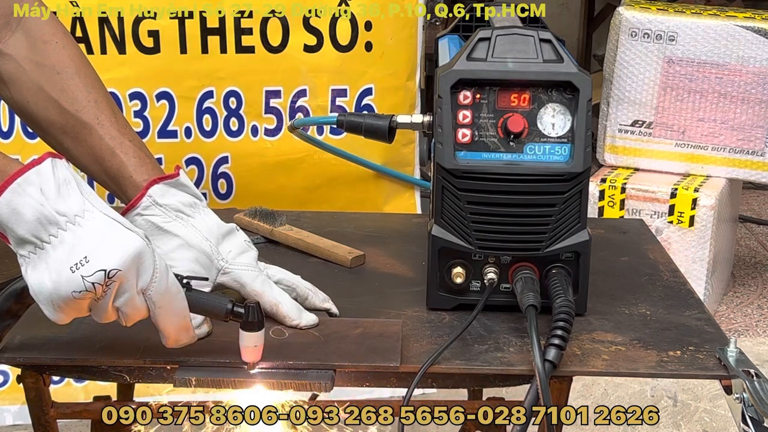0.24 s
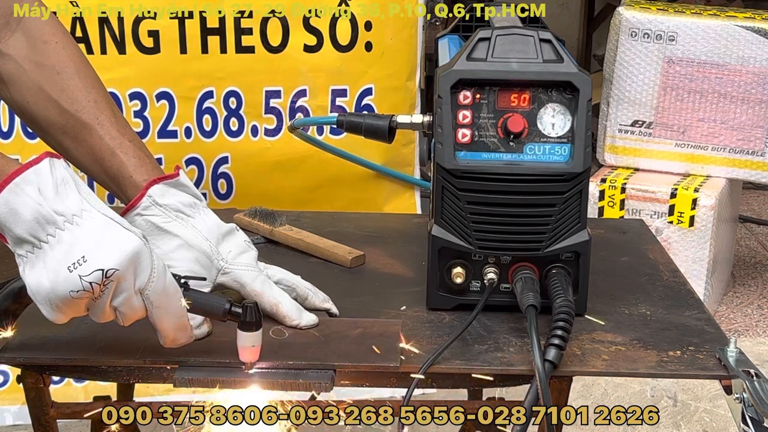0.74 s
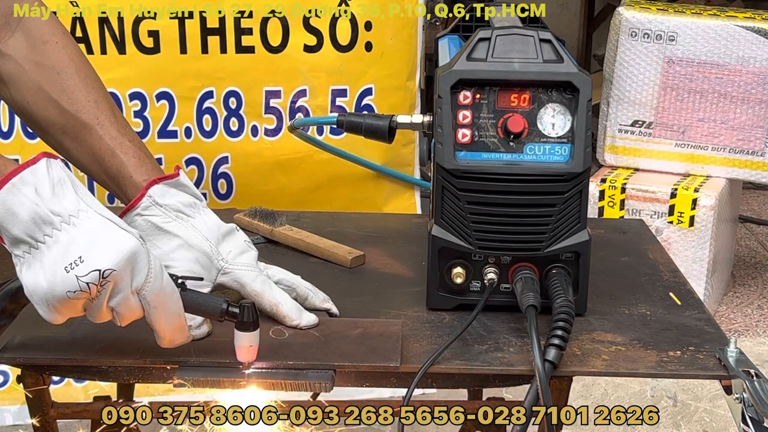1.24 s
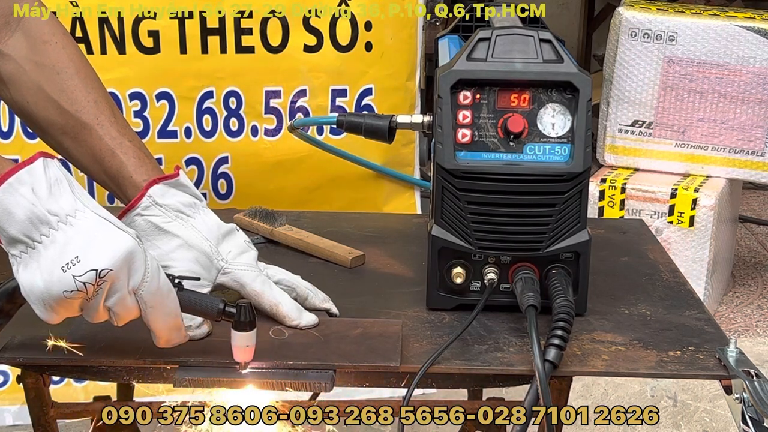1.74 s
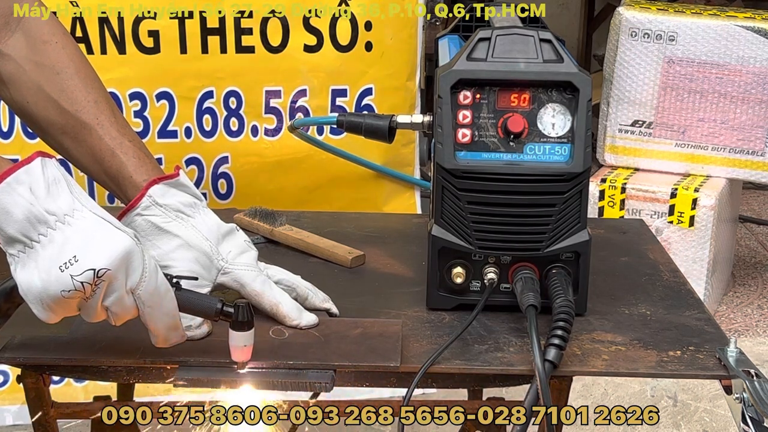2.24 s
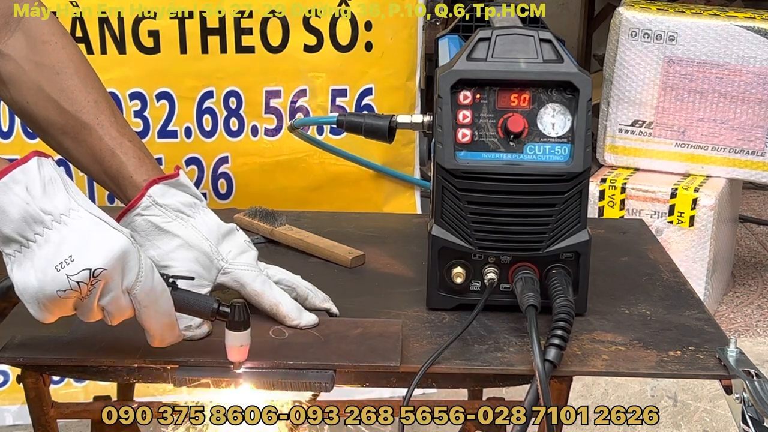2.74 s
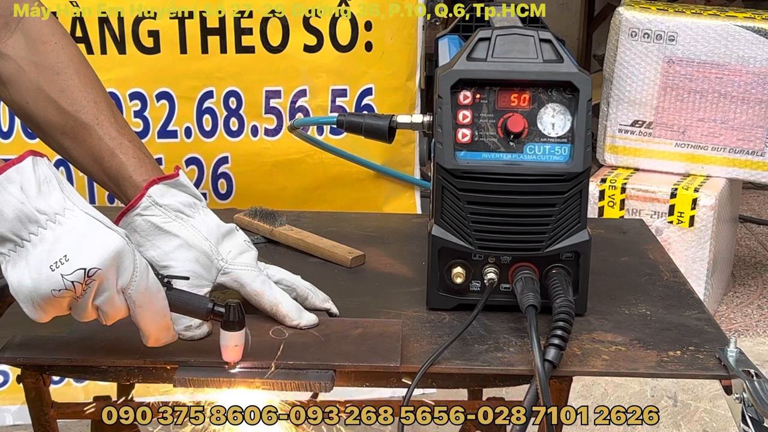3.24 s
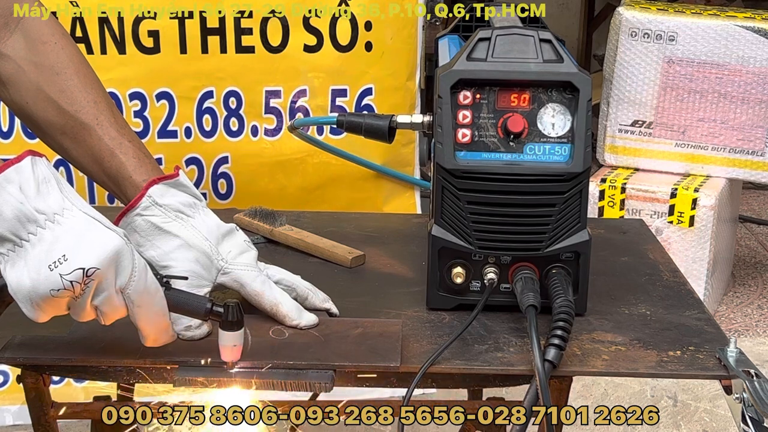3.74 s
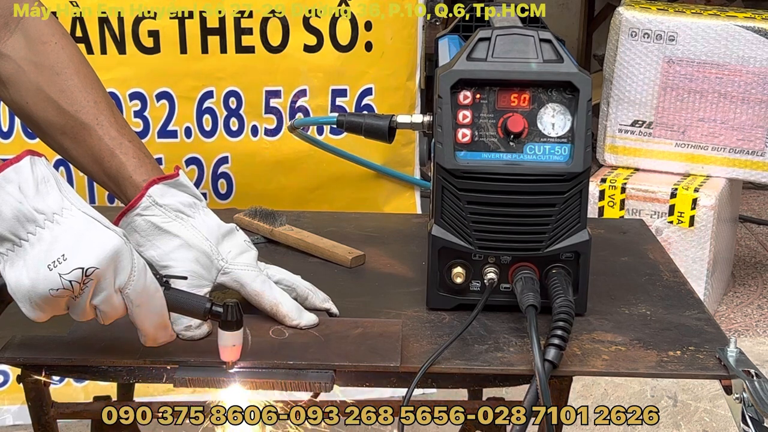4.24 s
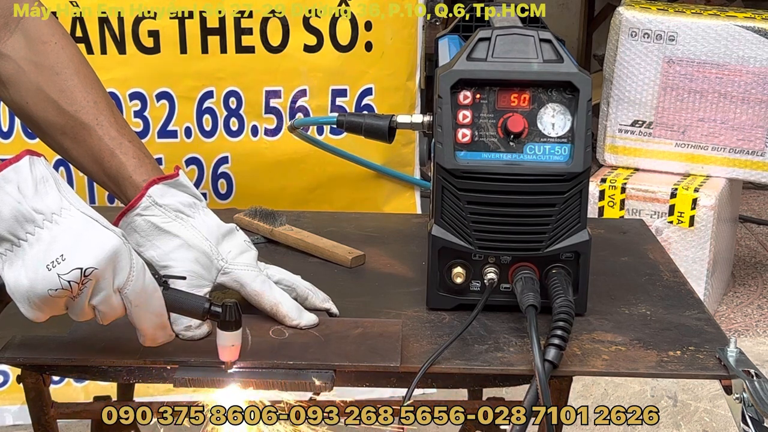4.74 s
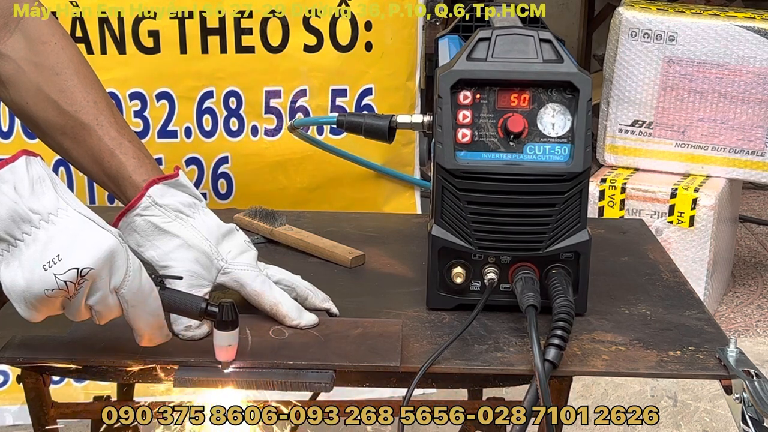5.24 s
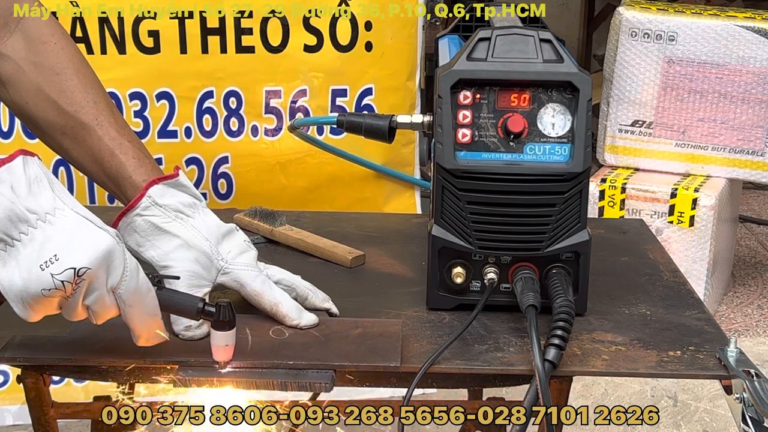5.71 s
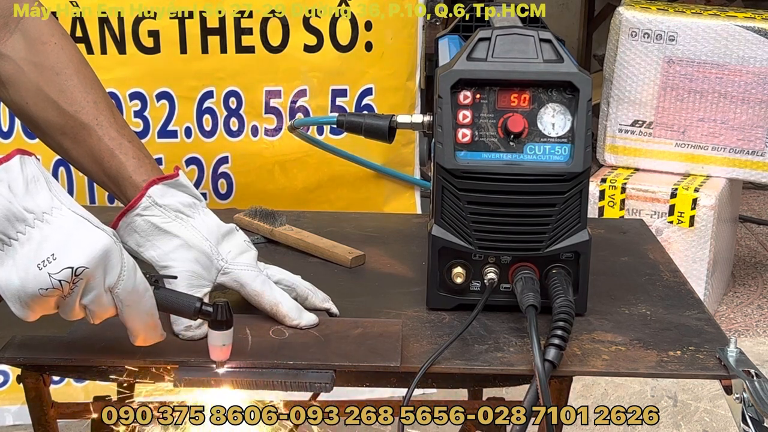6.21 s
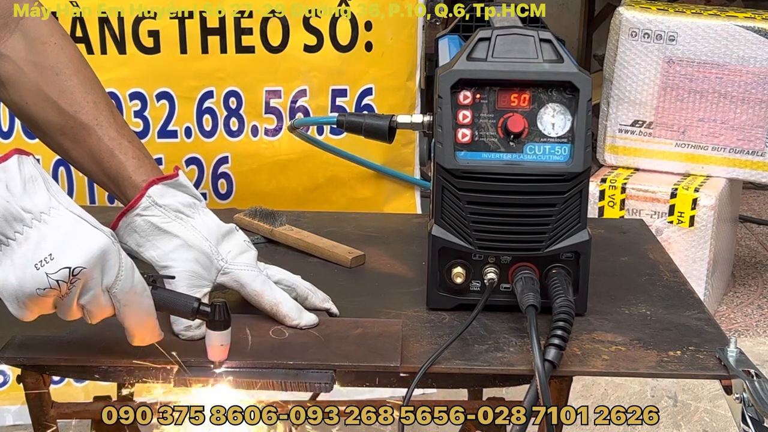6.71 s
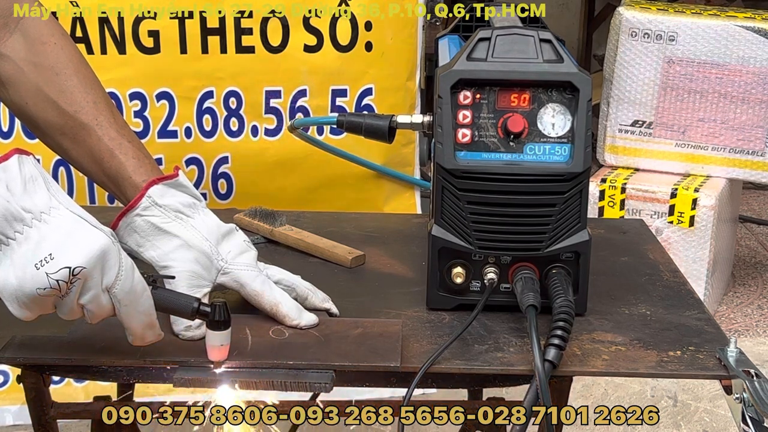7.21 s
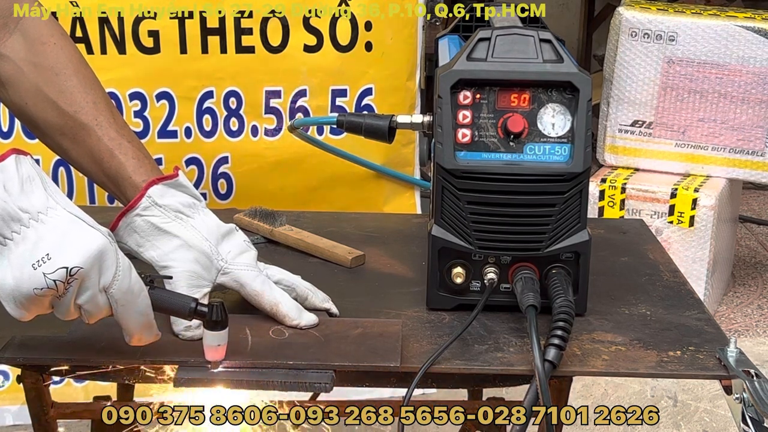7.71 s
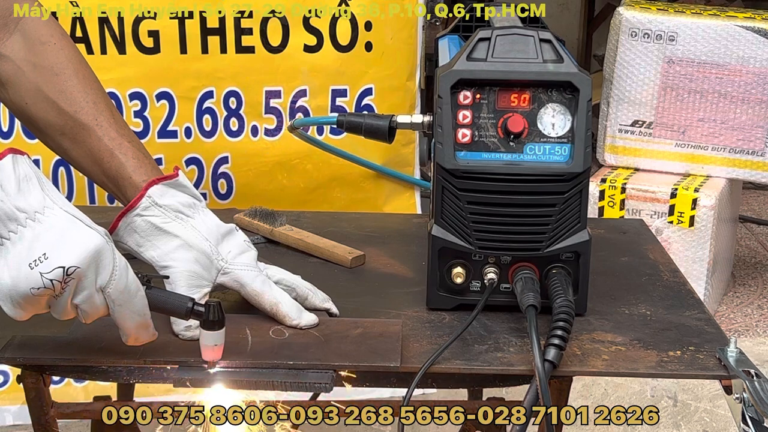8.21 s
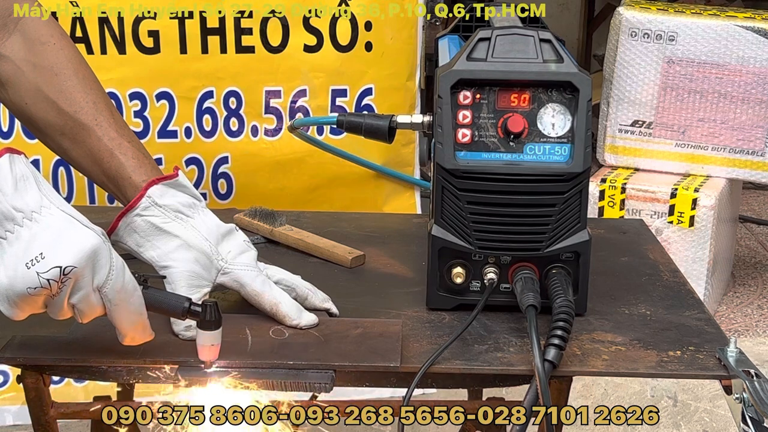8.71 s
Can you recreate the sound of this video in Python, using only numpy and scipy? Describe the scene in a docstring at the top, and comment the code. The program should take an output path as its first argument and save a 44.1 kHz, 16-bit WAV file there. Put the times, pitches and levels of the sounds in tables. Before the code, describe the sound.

A hand-held plasma torch cuts steel plate, already running at the start and never stopping. A piercing high gas hiss and grainy arc rasp sit over a hollow mid roar and softer low rush. Roughly twice a second it slackens briefly; occasional spurts swell the roar. Close, dry, centred microphone at an outdoor-like workbench, with barely noticeable reflections.

```python
"""A hand-held plasma torch is drawn slowly through a steel plate on a bench, close to the microphone.
Four layers of filtered noise: the jet sizzles, brightest at the very top; the arc rasps on the steel;
the blast roars through the cut in a few hollow resonances; spent gas billows out low below the plate.
About twice a second the arc runs short of steel and the sound slackens; now and then melt spurts out
and the roar swells. Passing resonances and moving echoes shift the colour as the torch creeps along."""
import sys
import numpy as np
from scipy import signal
from scipy.fft import rfft, irfft
from scipy.io import wavfile
from scipy.ndimage import uniform_filter1d, map_coordinates

SR = 44100
rng = np.random.default_rng(int(sys.argv[2]) if len(sys.argv) > 2 else 0)


def output_pcm(signal):
    """Save a mono or channel-first signal as 16-bit PCM at the path in sys.argv[1].

    Samples are clipped to [-1, 1] before scaling.
    """
    pcm = np.clip(np.atleast_2d(signal).T, -1, 1) * 32767
    wavfile.write(sys.argv[1], SR, np.round(pcm).astype(np.int16))


N = 395136
TIME = np.arange(N) / SR  # s
HZ = np.fft.rfftfreq(N, 1 / SR)

# resonances around the nozzle and its cup: (centre [Hz], width [Hz], lift [dB])
NOZZLE_RESONANCES = [(3890, 420, 4.7), (5450, 300, 1.5), (6430, 150, 2), (6830, 200, 2), (7370, 750, 4.5),
                     (9550, 900, 2.5), (10850, 350, 3.2), (11570, 500, 2.8), (12650, 300, 2),
                     (13450, 600, 3), (14540, 300, 3), (14950, 550, 4.4), (15520, 400, 2.5)]
# slow drift of the blast, which also feeds the plume: (time [s], level before offsets and mix [dB])
BLAST_DRIFT = [(0, -26.6), (1.2, -27), (2.4, -27), (3.9, -27.5), (4.6, -28.1), (5.6, -26.7), (6.5, -26.5),
               (7.2, -27.5), (7.8, -26.5), (8.96, -27.5)]
# lulls between steps of the hand, with little steel to bite:
# (middle [s], width at half height [s], depth before layer scaling [dB])
HAND_LULLS = [(0.31, 0.24, 1.3), (0.85, 0.12, 0.5), (1.43, 0.09, 1), (1.84, 0.11, 2.5), (2.3, 0.19, 1.3),
              (2.77, 0.13, 1.5), (3.17, 0.12, 2), (3.48, 0.093, 2.5), (3.95, 0.17, 0.8), (4.74, 0.12, 1.5),
              (5.14, 0.12, 2), (5.54, 0.16, 2), (5.98, 0.16, 1.8), (6.48, 0.18, 2), (7.0, 0.09, 1.3),
              (7.6, 0.08, 1.5), (8.03, 0.16, 1.5), (8.35, 0.14, 1.6), (8.72, 0.1, 2.5)]
# melt blown through the cut: (middle [s], width at half height [s], swell before layer scaling [dB])
MELT_SPURTS = [(0.8, 0.08, 0.8), (2.04, 0.14, 1.3), (2.53, 0.1, 0), (3.04, 0.12, 1.2), (3.68, 0.073, 0.5),
               (5.71, 0.073, 1.6), (6.33, 0.12, 0.8), (6.68, 0.12, 1.8), (8.29, 0.11, 1.2),
               (8.87, 0.08, 2.0)]


def gain_of(db):
    """Decibels to amplitude."""
    return 10 ** (np.asarray(db) / 20)


def evened(x):
    """Scales to rms 1."""
    return x / np.sqrt(np.mean(x ** 2) + 1e-20)


def unit_in(x, low_hz, high_hz):
    """Scales to rms 1 within a band."""
    in_band = irfft(rfft(x) * (HZ > low_hz) * (HZ < high_hz), N)
    return x / np.std(in_band)


def level(curve):
    """A dB curve as a gain for every sample."""
    time_s, level_db = np.transpose(curve)
    return gain_of(np.interp(TIME, time_s, level_db))


def bell(offset, width):
    """A smooth hump of height 1, with the given width at half height."""
    return 0.5 ** ((2 * offset / width) ** 2)


def swells(events):
    """Each event rises and falls as one hump; their sum in dB for every sample."""
    coarse_s = TIME[::128]
    total_db = sum(db * bell(coarse_s - middle_s, length_s) for middle_s, length_s, db in events)
    return np.interp(TIME, coarse_s, total_db)


def wander(rate_hz):
    """Slow random motion of rms 1, with little motion above the rate."""
    spectrum = rfft(rng.standard_normal(N))
    return evened(irfft(spectrum / (1 + (HZ / rate_hz) ** 4), N))


def turbulence(flutter_db, flutter_hz, grain_db, grain_hz):
    """Noise that flutters with large eddies and is grainy with small ones (rms dB)."""
    flutter = flutter_db * wander(flutter_hz)
    grain = grain_db * wander(grain_hz)
    return rng.standard_normal(N) * gain_of(flutter + grain)


def shaped(x, colour, modes=()):
    """Filters by a smooth spectrum with resonances standing on it."""
    colour_hz, colour_db = np.transpose(colour)
    db = np.interp(np.log(HZ + 1), np.log(colour_hz), colour_db)
    for centre_hz, width_hz, lift_db in modes:
        db = db + lift_db / (1 + (2 * (HZ - centre_hz) / width_hz) ** 2)
    return irfft(rfft(x) * gain_of(db), N)


def jet():
    """The narrow, fast jet hisses very high, sizzles as the arc shakes it, and feels lulls only a little."""
    # slow drift at the nozzle: (time [s], level before mix [dB])
    drift = [(0, -18), (2.3, -18.5), (4.2, -18), (6.7, -16.5), (8, -18), (8.96, -16.5)]
    # smooth spectrum: (frequency [Hz], relative density [dB])
    colour = [(50, -70), (2000, -35), (6000, -20), (8500, -14), (11000, -5.8), (12300, -4.8), (13200, -2.3),
              (14100, -2.8), (15000, -.4), (16000, -.4)]
    # brief flares of the highest hiss: (middle [s], width at half height [s], swell [dB])
    flares = [(0.52, 0.05, 2), (3.07, 0.06, 2), (5.22, 0.06, 2), (5.75, 0.1, 0.5), (6.43, 0.055, 1),
              (7.44, 0.08, 1.2)]
    noise = turbulence(flutter_db=0.45, flutter_hz=10, grain_db=0.7, grain_hz=600)
    gas = shaped(noise, colour, NOZZLE_RESONANCES)
    push_db = swells(flares) - 0.57 * swells(HAND_LULLS)  # dB per dB of lull
    return level(drift) * gain_of(push_db) * unit_in(gas, 12000, 15700)


def rasp():
    """The arc scours the steel and slackens in every lull."""
    # slow drift on the cut face: (time [s], level before mix [dB])
    drift = [(0, -23.5), (1.3, -23), (3.5, -23.5), (5.8, -23.0), (6.9, -22.5), (8.96, -22.5)]
    # smooth spectrum: (frequency [Hz], relative density [dB])
    colour = [(20, -57), (300, -24), (1800, -14.5), (3200, -6), (4600, -2.5), (6200, -1), (8200, -0.5),
              (10500, -0.5), (13000, 0.5), (16000, 3)]
    noise = turbulence(flutter_db=0.51, flutter_hz=40, grain_db=-0.3, grain_hz=700)
    gas = shaped(noise, colour, NOZZLE_RESONANCES)
    push_db = -1.14 * swells(HAND_LULLS)
    return level(drift) * gain_of(push_db) * unit_in(gas, 3200, 10000)


def blast():
    """Gas sputters past the melt and sounds the hollow of the cut, swelling with the spurts."""
    # smooth spectrum: (frequency [Hz], relative density [dB])
    colour = [(20, -55), (100, -42), (600, -4.5), (1000, -8), (1500, -3.5), (2300, 0), (3100, -4),
              (5000, -13), (12000, -31)]
    # resonances of the cut and the gap under the torch: (centre [Hz], width [Hz], lift [dB])
    cut_modes = [(826, 114, 10.5), (1211, 230, 11), (1584, 58, 6), (1794, 124, 5.5), (2047, 181, 12.5),
                 (2260, 68, 6), (2449, 118, 8), (2650, 84, 5.5)]
    noise = turbulence(flutter_db=0.5, flutter_hz=19, grain_db=0.7, grain_hz=402)
    gas = shaped(noise, colour, cut_modes)
    push_db = 1.1 * swells(MELT_SPURTS) - 0.69 * swells(HAND_LULLS)
    return level(BLAST_DRIFT) * gain_of(push_db) * unit_in(gas, 1100, 2800)


def plume():
    """Spent gas billows out below the plate, following the blast."""
    # smooth spectrum: (frequency [Hz], relative density [dB])
    colour = [(8, -40), (25, -19), (50, -13), (100, -6), (190, -4.5), (340, 1.5), (560, 2), (950, -5),
              (2000, -20.5), (6000, -44)]
    below_blast_db = 7.5  # before mix
    noise = turbulence(flutter_db=0.23, flutter_hz=7.1, grain_db=1, grain_hz=200)
    gas = shaped(noise, colour)
    push_db = 0.97 * swells(MELT_SPURTS) - 0.55 * swells(HAND_LULLS)
    return level(BLAST_DRIFT) * gain_of(push_db - below_blast_db) * unit_in(gas, 100, 950)


def shifting(x, patchy_db=1.6):
    """The gap under the torch keeps changing shape: resonances come and go, and the treble shimmers."""
    # resonances that swell (+) or choke (-) as the torch moves, widths at half height:
    # (middle [s], length [s], centre [Hz], width [Hz], lift [dB])
    passing = [(0.22, 4.5, 2640, 390, 1.5), (0.83, 2, 1870, 356.4, -4.5), (1.1, 1.3, 11200, 416.7, 0.5),
               (1.9, 2.0, 15000, 380, 1), (2.8, 1.6, 770, 93, 4), (3.8, 3.7, 15100, 560, 3.5),
               (4.0, 4.5, 13900, 400, 2), (4.8, 3.5, 8200, 450, -1.5), (5.34, 1.0, 1180, 120, 2.5),
               (6.24, 1.3, 3800, 450, 2.5), (7.1, 1.4, 790, 150, 6.5), (7.23, 0.81, 804, 140, -10),
               (7.16, 0.51, 5330, 300, 5), (7.5, 2.0, 4400, 400, -2.5), (7.6, 3.4, 2350, 640, -2)]
    hz, frame_s, z = signal.stft(x, SR, nperseg=1024, noverlap=768)
    hz = hz[:, None]
    db = np.zeros(z.shape)
    for middle_s, length_s, centre_hz, width_hz, lift_db in passing:
        db += lift_db * bell(frame_s - middle_s, length_s) * bell(hz - centre_hz, width_hz)
    patches = uniform_filter1d(rng.standard_normal(z.shape), size=45, axis=1)  # frames
    patches = evened(uniform_filter1d(patches, size=4, axis=0))  # bins
    db += patchy_db * patches * np.minimum(hz / 8000, 1)  # short waves feel small movements most
    return signal.istft(z * gain_of(db), SR, nperseg=1024, noverlap=768)[1][:N]


def near_echoes(x, tremor_ms=0.072, tremor_hz=0.91):
    """Short paths change length as the hand creeps along and trembles, so the hiss phases slightly."""
    # echoes off the gloves and the bench, delays before tremor:
    # (delay at start [ms], delay at end [ms], strength [amplitude ratio])
    echoes = [(1.7, 2.35, 0.027), (2.4, 1.75, 0.013), (3.3, 3.8, 0.026), (3.7, 5.3, 0.02),
              (5.1, 4.2, 0.035), (6.3, 6.9, 0.03)]
    out = x.copy()
    for start_ms, end_ms, strength in echoes:
        delay_ms = np.linspace(start_ms, end_ms, N) + tremor_ms * wander(tremor_hz)
        place = (TIME - delay_ms / 1000) * SR  # fractional sample
        out += strength * map_coordinates(x, [place], order=3, mode="mirror")
    return out


def scene():
    """Mixes the four torch layers and sends the same signal to both channels."""
    hiss = gain_of(-2.24) * jet() + gain_of(-1) * rasp()
    roar = gain_of(0.32) * blast() + gain_of(-2.5) * plume()
    torch = near_echoes(shifting(hiss + roar))
    return np.array([torch, torch])


def record(dry):
    """The recorder's steep band limit: a linear-phase low-pass."""
    edge_hz = 15760
    low_pass = signal.firwin(1023, edge_hz, window=("kaiser", 8), fs=SR)
    return signal.oaconvolve(dry, low_pass[None], "same")


dry = scene()
out = record(dry)
output_pcm(out)
```